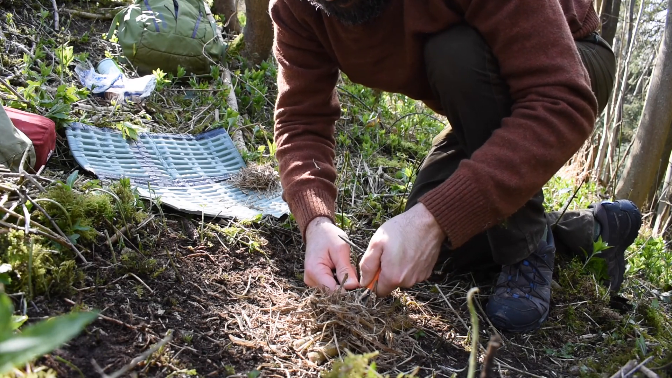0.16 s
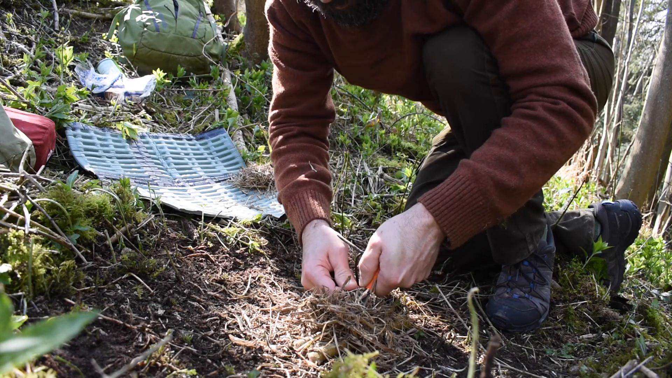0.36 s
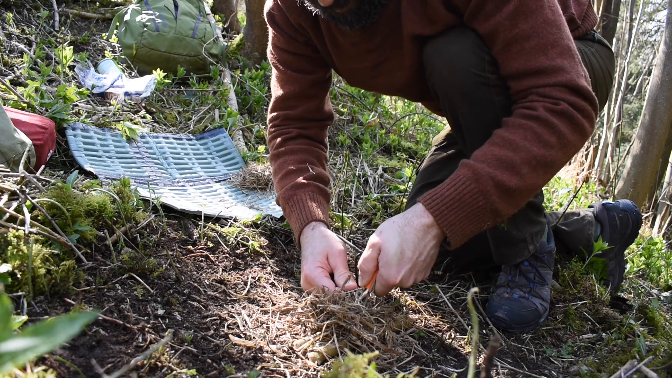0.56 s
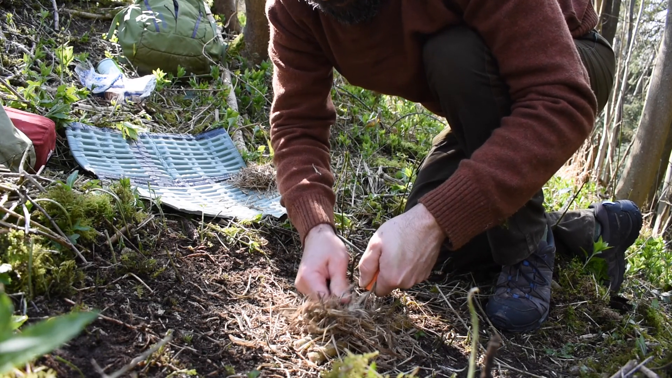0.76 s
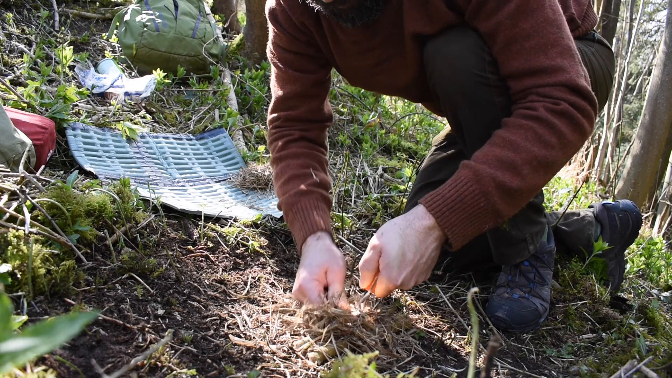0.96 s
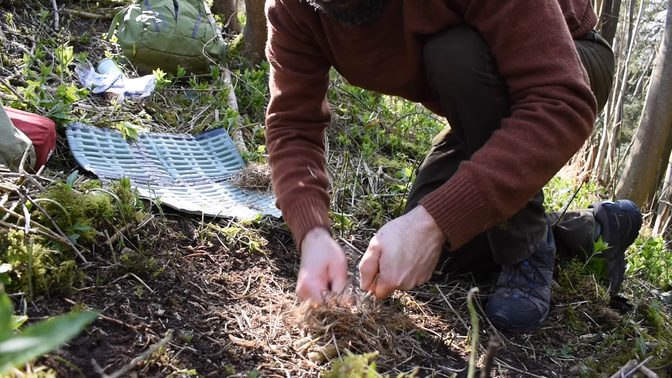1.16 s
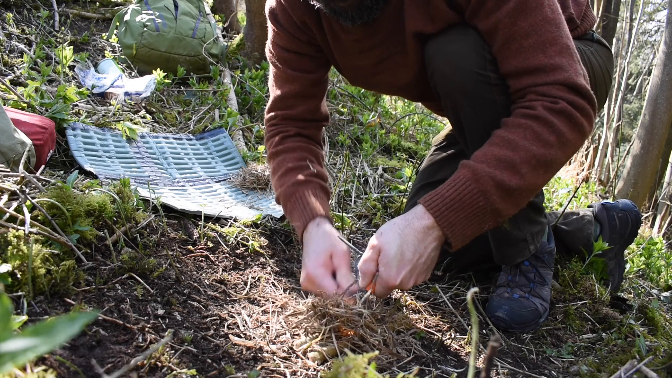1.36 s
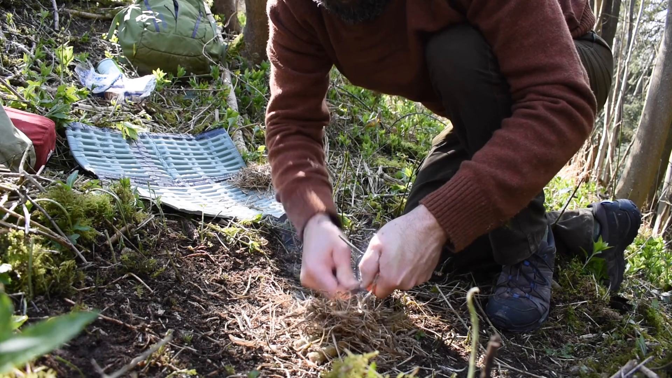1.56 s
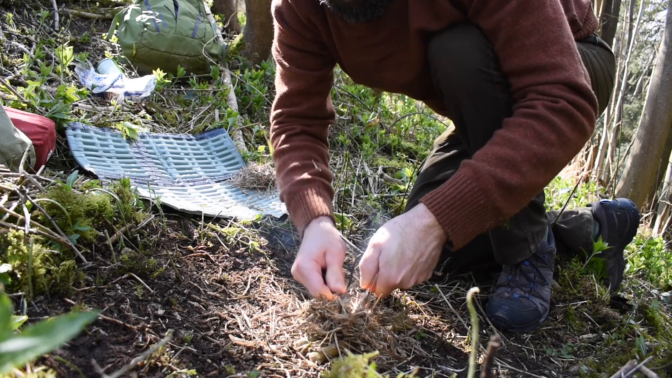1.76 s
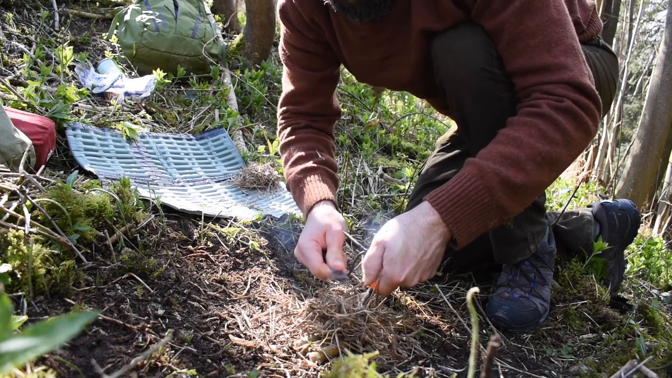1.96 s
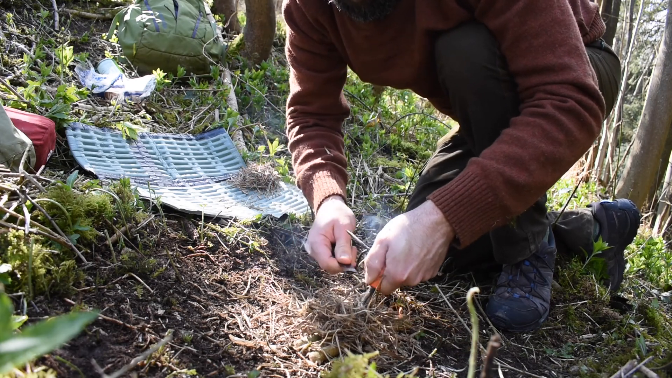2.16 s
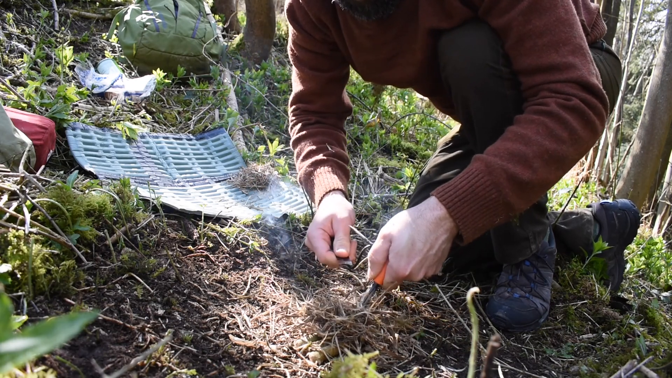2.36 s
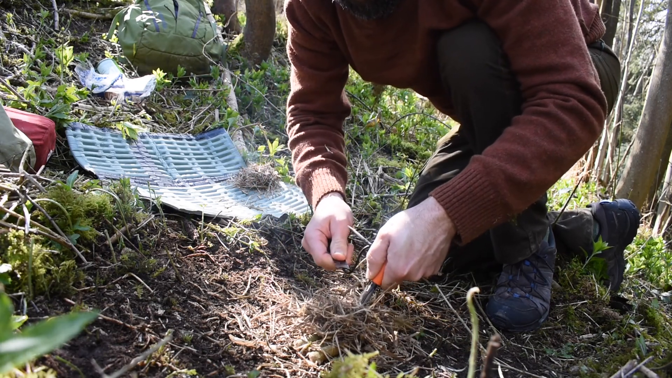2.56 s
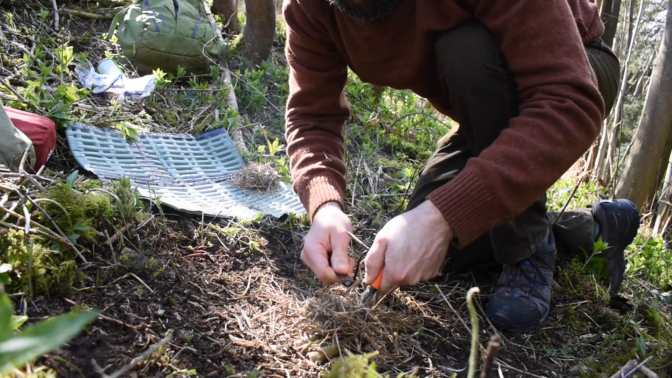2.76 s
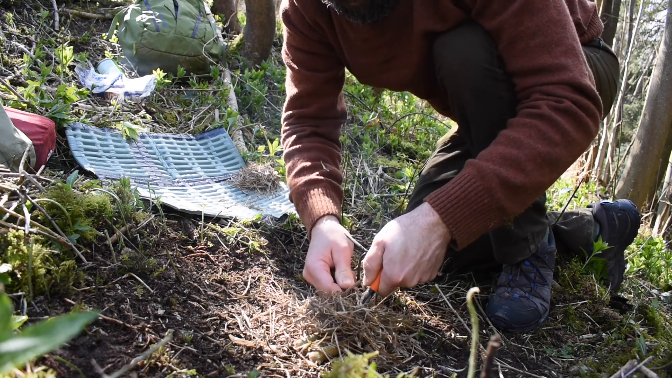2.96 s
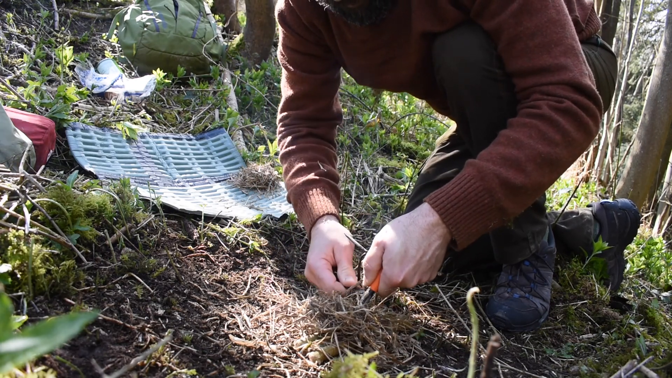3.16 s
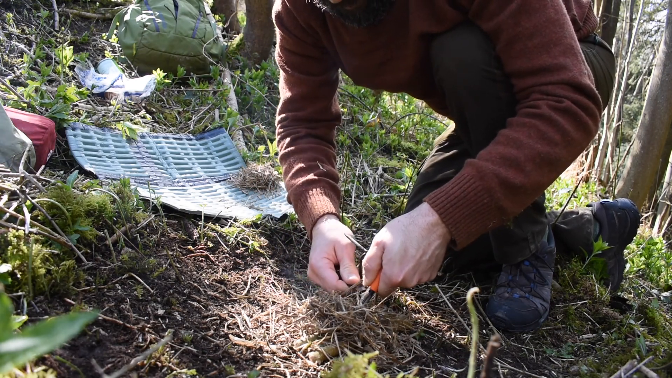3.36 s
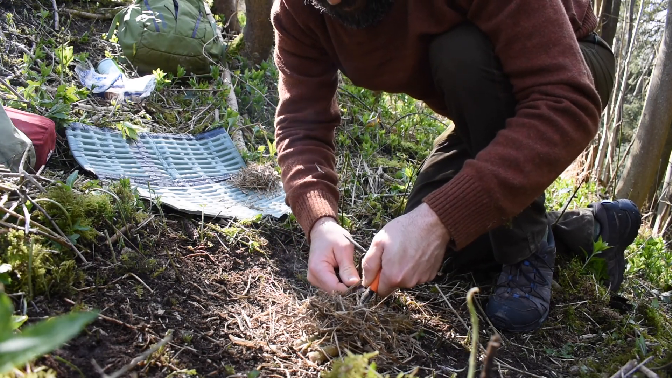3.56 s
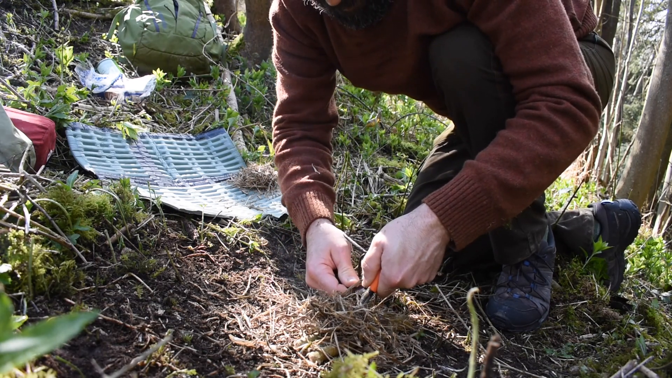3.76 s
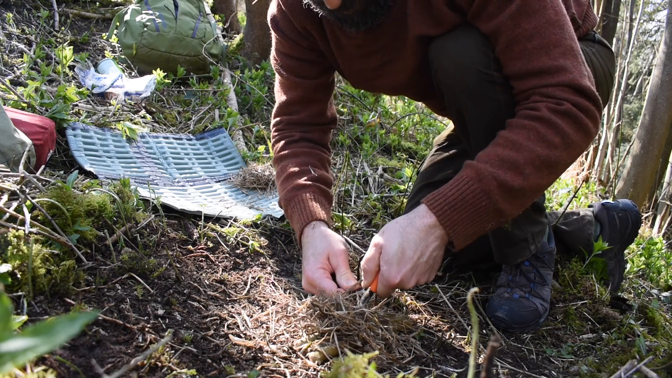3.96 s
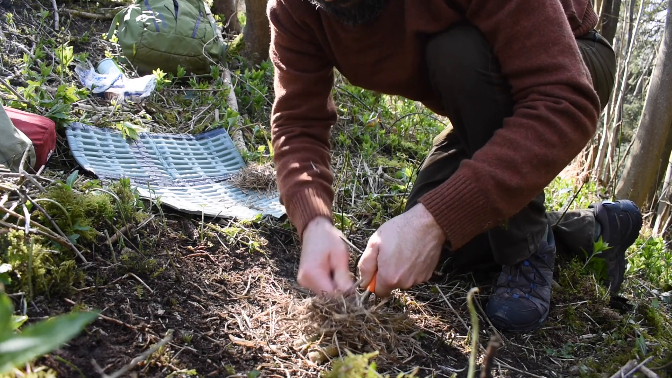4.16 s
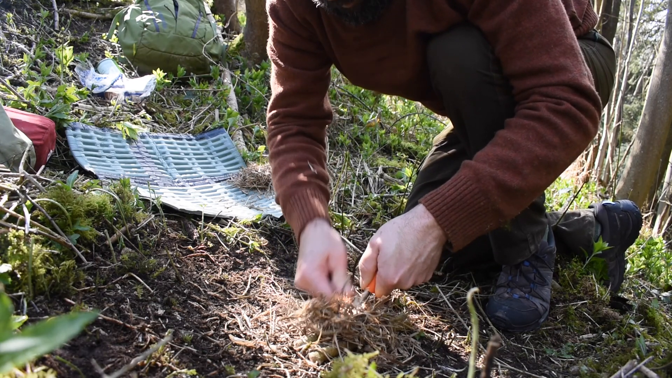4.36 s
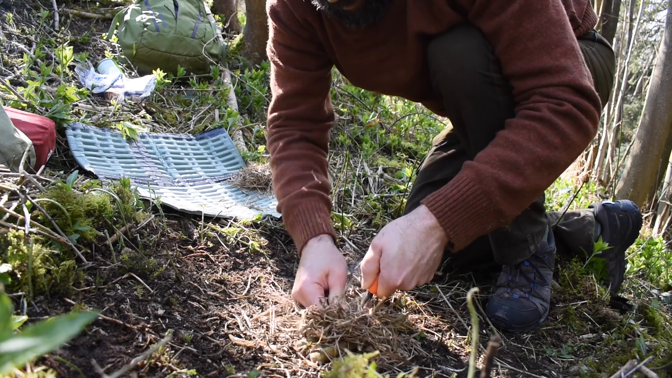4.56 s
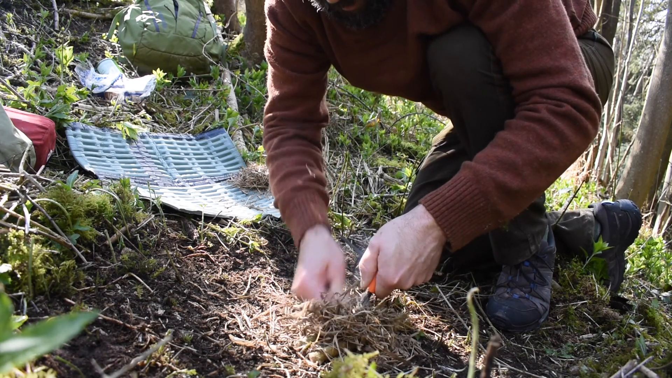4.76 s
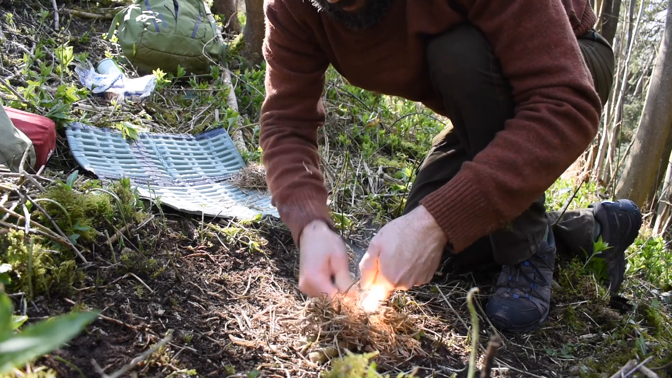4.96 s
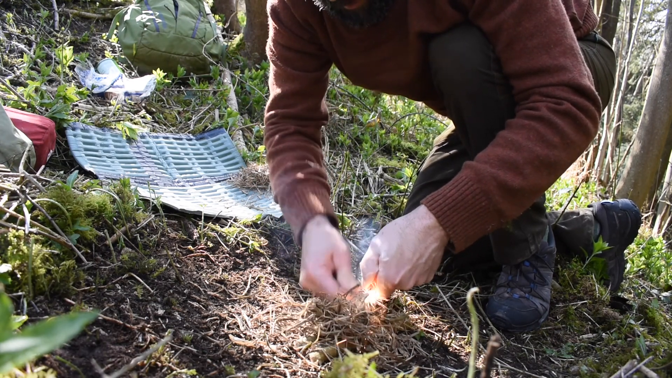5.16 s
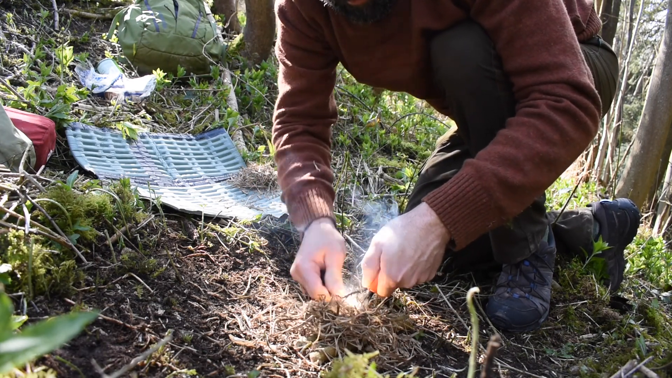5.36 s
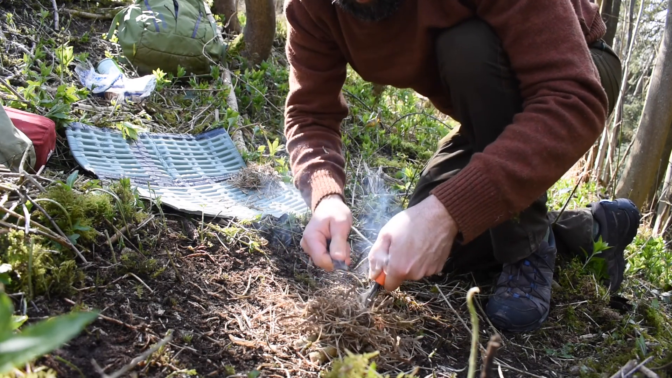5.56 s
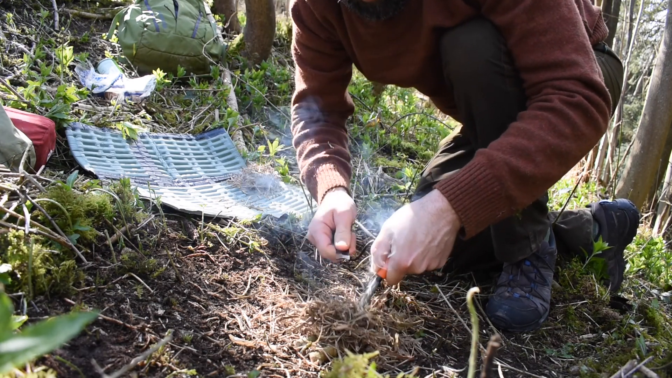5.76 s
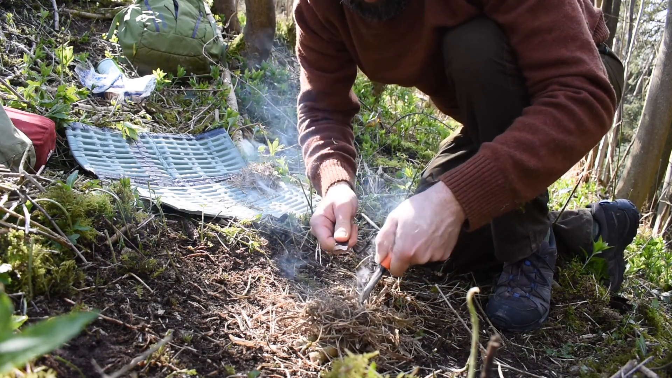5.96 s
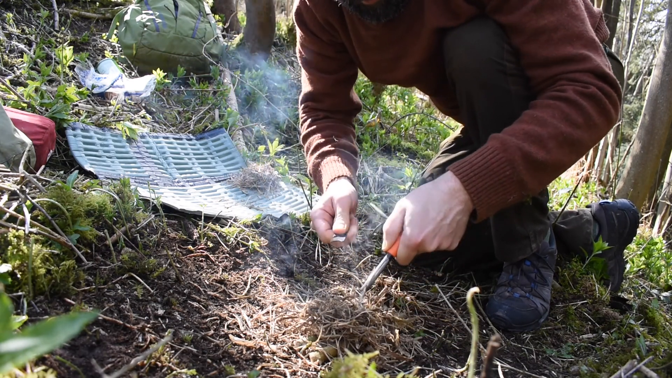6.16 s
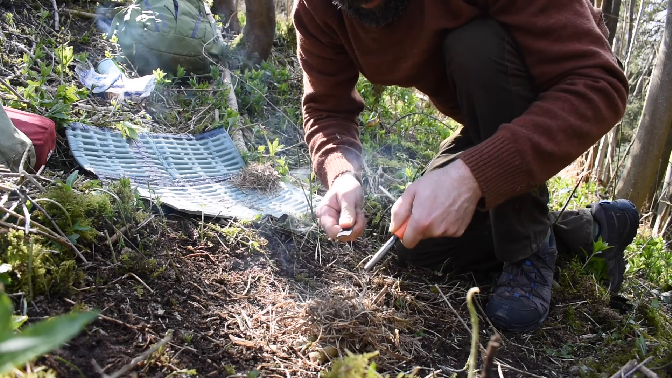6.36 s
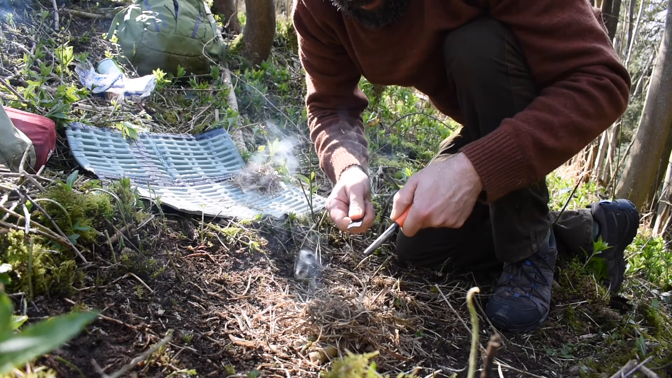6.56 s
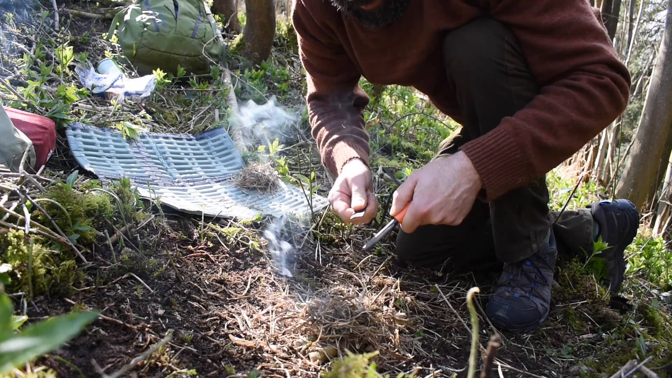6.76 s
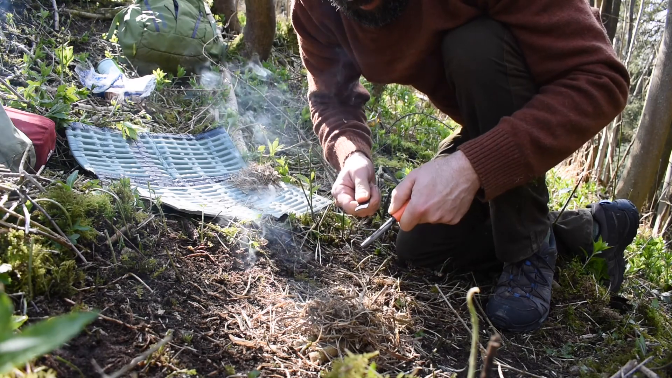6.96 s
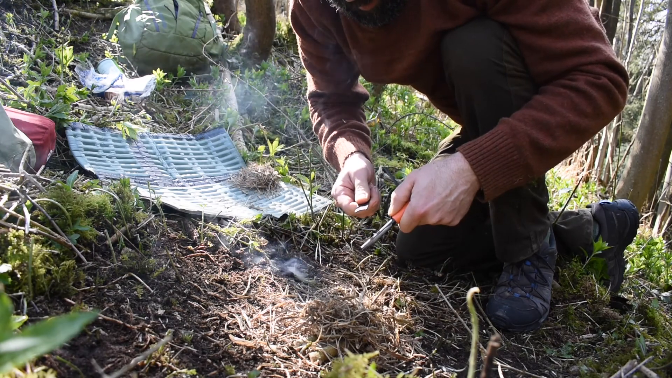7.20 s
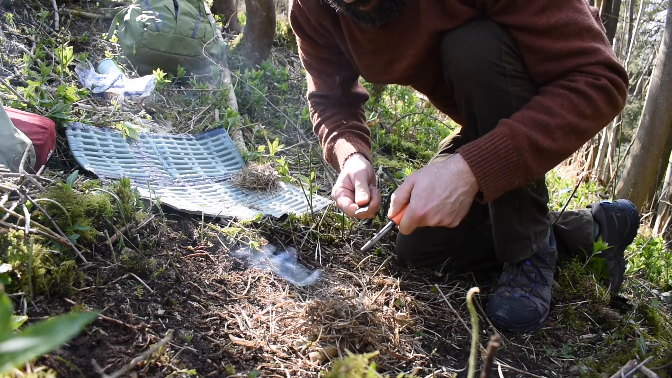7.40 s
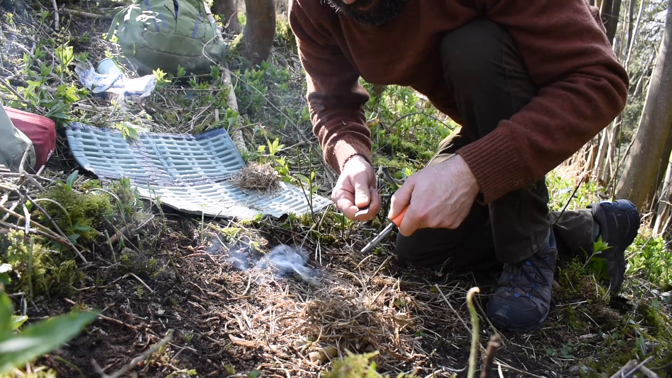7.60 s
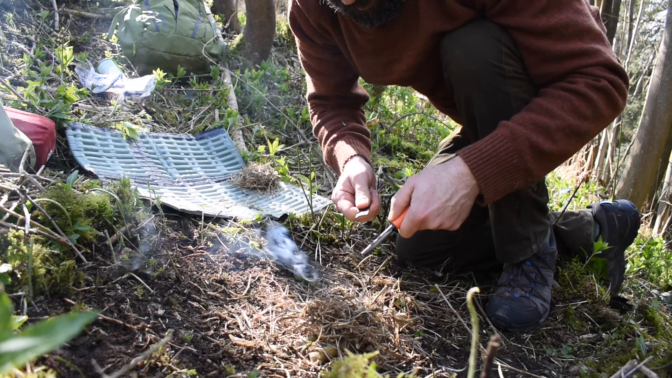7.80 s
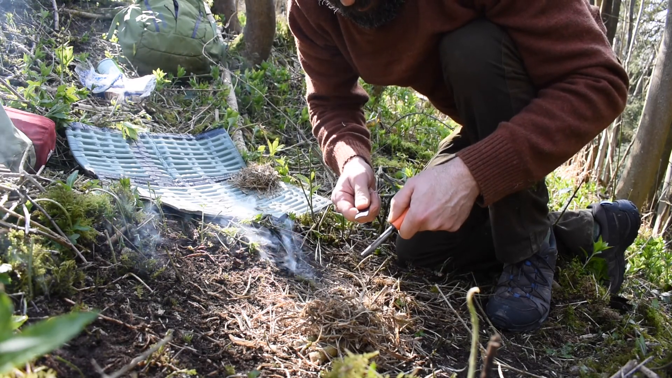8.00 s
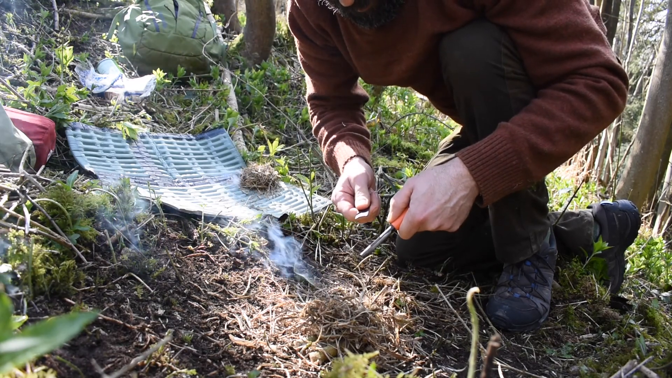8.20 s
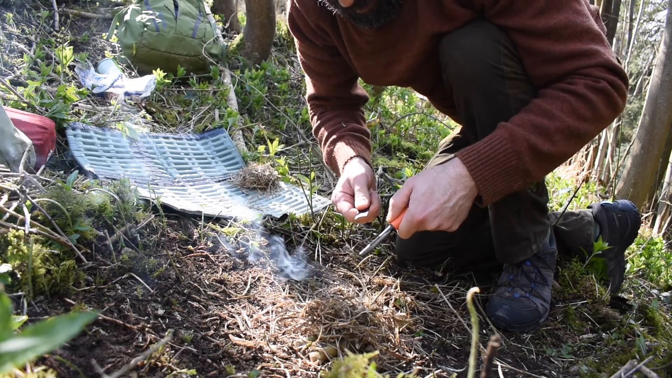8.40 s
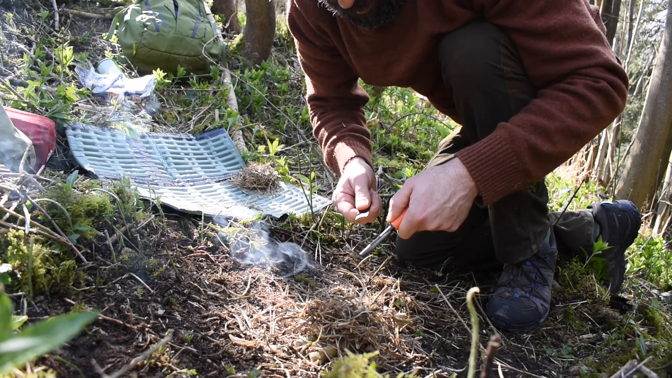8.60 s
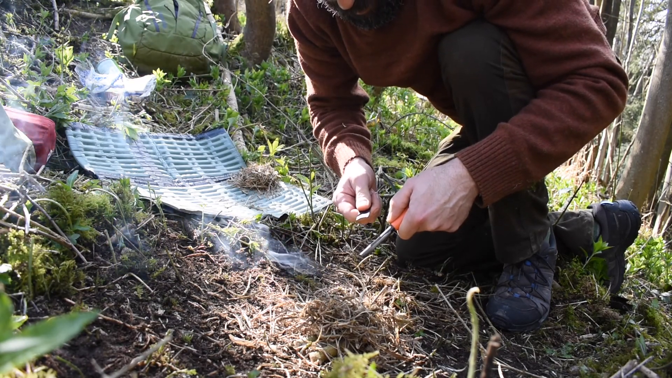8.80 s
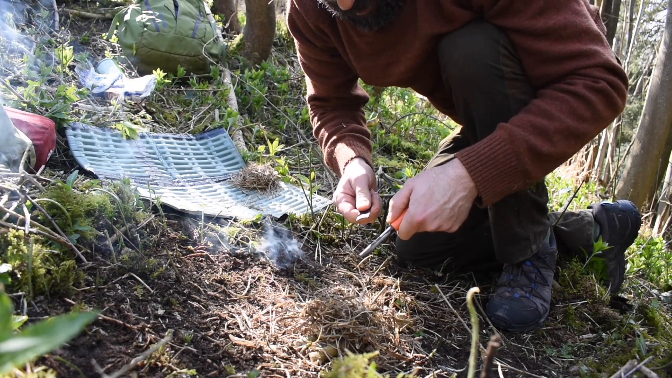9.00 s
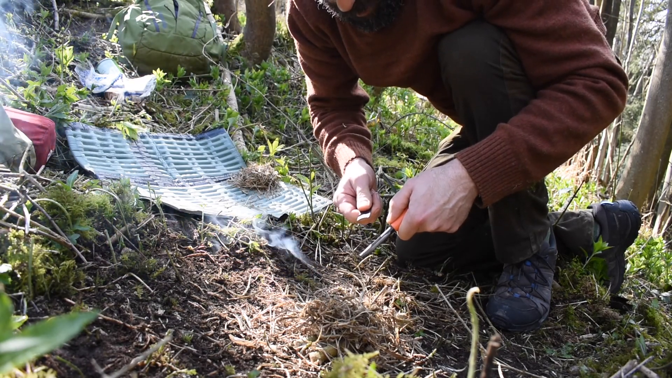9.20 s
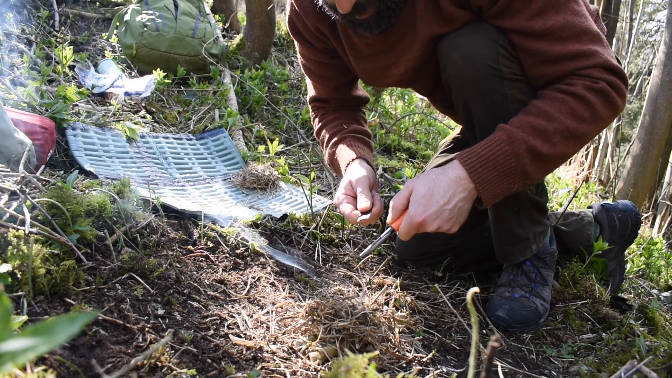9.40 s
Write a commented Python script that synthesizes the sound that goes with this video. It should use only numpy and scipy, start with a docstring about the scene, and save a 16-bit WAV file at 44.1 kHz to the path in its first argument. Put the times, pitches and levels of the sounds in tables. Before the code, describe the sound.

Steel striker rasps down a spark rod in two quick bouts of bright ringing scrapes and crackling sparks, then small clicks and birdsong in quiet woods.

```python
"""On a woodland floor, a steel striker is scraped down a ferro rod in two bouts, over dry tinder.
Grainy friction drives resonances, so the edge bites with a rough, rising ring; shavings flare and crackle
as bursts of filtered grains. Short pulses make the tools click, and the tinder rustles and smoulders in grains.
A small bird repeats a three-note song and another whistles and warbles, all from gliding sines.
Something drones far away on a wavering low tone, under steady air made of filtered noise."""
import sys
import numpy as np
from scipy import signal
from scipy.fft import rfft, irfft
from scipy.io import wavfile

SR = 44100
rng = np.random.default_rng(int(sys.argv[2]) if len(sys.argv) > 2 else 0)


def transcribe(signal):
    """Save signal, clipped to [-1, 1], as a 16-bit WAV file at the path in sys.argv[1]."""
    frames = np.atleast_2d(signal).T
    limited = np.clip(frames, -1, 1)
    pcm = np.round(limited * 32767).astype(np.int16)
    wavfile.write(sys.argv[1], SR, pcm)


N = 416304
TIME = np.arange(N) / SR
WOODS_T60_S = 0.419  # time for the echoes among the trees to fall by 60 dB

# resonances of the striker's edge: (multiple of the ring pitch, width/Hz, relative level/dB)
EDGE_MODES = [(.35, 700, -25.5), (.68, 497, -13.5), (.91, 330, 0), (1.02, 330, 1.5), (1.1, 400, -3),
              (1.29, 698, -12.5), (1.57, 1010, -19.5), (2.15, 1810, -32.5)]
# colour of the flare, also of the rasp under a cut: (f/Hz, relative level/dB)
FLARE_COLOUR = [(40, -43), (110, -28.5), (170, -18), (330, -11.5), (560, -8), (760, 2.5), (1020, -0.5),
                (1200, -11.5), (1430, 3.5), (1800, -0.5), (2400, 4.5), (3300, 2.5), (4400, -3.5),
                (11000, -40)]
# the bright, the middle and the dull part of a tick or a snapping stalk: (f/Hz, relative level/dB)
TICK_TOP = [(2000, -40.5), (4000, -15), (5000, -4), (6000, -3), (7000, 2), (8000, -2), (9000, -6.5),
            (10000, -15.5), (11000, -21.5), (14000, -24.5), (16000, -35)]
TICK_CRACK = [(600, -31.5), (1200, -8.5), (1600, -2), (2400, 0.5), (3300, -2), (4200, -5), (5500, -16.5),
              (11000, -52.5)]
TICK_KNOCK = [(60, -33.5), (250, -9.5), (500, -6), (760, 1.5), (1000, -1), (1250, -8), (3000, -37.5)]


def from_db(db):
    """Turn decibels into a plain gain."""
    return 10 ** (np.asarray(db) / 20)


def rms_one(x):
    """Scale a sound to an rms (average strength) of 1."""
    return x / np.sqrt(np.mean(x ** 2) + 1e-20)


def in_time(points):
    """Join rows of (t/s, value) by straight lines."""
    return np.interp(TIME, *np.transpose(points))


def envelope(events, attack_s, swell_db, fade_db_per_s, column=2):
    """Gain of events (start/s, length/s, .. level/dB ..): each rises, swells or sags, then fades."""
    power = np.zeros(N)
    for row in events:
        start, length = row[0], max(row[1], .005)
        span = slice(int(start * SR), int((start + length + .5) * SR))
        t = TIME[span] - start
        swell = swell_db * (np.minimum(t / length, 1) - .5)
        fade = fade_db_per_s * np.maximum(t - length, 0)
        rise = np.clip(t / attack_s, 0, 1)
        power[span] += (rise * from_db(row[column] + swell - fade)) ** 2
    return np.sqrt(power)


def drift(rate):
    """Slow random wandering with a spread of 1; a higher rate (Hz) wanders faster."""
    # smooth noise at a twentieth of the sample rate, then join the points
    r = np.exp(-40 * np.pi * rate / SR)
    noise = rng.standard_normal(N // 20 + 4002)
    slow = signal.lfilter([1], [1, -2 * r, r * r], noise)[4000:]
    return np.interp(np.arange(N) / 20, np.arange(len(slow)), rms_one(slow))


def chatter(rate, depth_db):
    """A randomly wavering gain of rms 1, such as uneven stick and slip."""
    return rms_one(from_db(depth_db * np.tanh(drift(rate) / 2) * 2))


def grains(per_s, spread_db, hiss):
    """Random tiny fractures of uneven size over a smooth hiss; rms 1."""
    sizes = from_db(spread_db * np.minimum(rng.exponential(1, N), 4))
    signed = sizes * rng.choice([-1, 1], N)
    fractures = rms_one(signed * (rng.random(N) < per_s / SR))
    return rms_one(fractures + hiss * rng.standard_normal(N))


def response(spectrum, size=4096):
    """Short filter of unit energy with the given colour, falling away below its first point."""
    hz, db = np.transpose(spectrum)
    grid = np.maximum(np.fft.rfftfreq(size, 1 / SR), 10)
    gain = from_db(np.interp(np.log(grid), np.log(hz), db)) * np.minimum(grid / hz[0], 1)
    # fold the cepstrum so that the filter's energy comes as early as possible
    cepstrum = irfft(np.log(gain))
    cepstrum[1:size // 2] *= 2
    cepstrum[size // 2 + 1:] = 0
    h = irfft(np.exp(rfft(cepstrum)))
    return h / np.linalg.norm(h)


def through(x, h):
    """Pass a sound through a filter or a cloud of echoes."""
    return signal.oaconvolve(x, h)[:N]


def dying_noise(t60):
    """A cloud of echoes of unit energy that falls by 60 dB in t60 seconds."""
    t = np.arange(int(t60 * SR) + 2) / SR
    cloud = rng.standard_normal(len(t)) * from_db(-60 * t / t60)
    return cloud / np.linalg.norm(cloud)


def resonate(x, hz, width_hz):
    """A resonance with gain 1 on top."""
    r = np.exp(-np.pi * width_hz / SR)
    feed = np.array([1, 0, -1]) * (1 - r * r) / 2
    return signal.lfilter(feed, [1, -2 * r * np.cos(2 * np.pi * hz / SR), r * r], x)


def ring(friction, modes, pitch, count):
    """Resonances driven by friction, following a moving pitch by cross-fades between fixed ones."""
    centres, step = np.linspace(pitch.min(), pitch.max() + 1, count, retstep=True)
    out = 0
    for hz in centres:
        body = 0
        for k, (ratio, width, db) in enumerate(modes):
            body = body + (-1) ** k * from_db(db) * resonate(friction, ratio * hz, width)
        nearness = np.maximum(1 - abs(pitch - hz) / step, 0)
        out = out + nearness * rms_one(body)
    return out


def glide(strokes, start_hz, end_hz):
    """A pitch that runs from start to end during every stroke, and stays there until the next."""
    pitch = np.full(N, np.mean(start_hz))
    each = np.ones(len(strokes))
    for row, first, last in zip(strokes, start_hz * each, end_hz * each):
        at = int(row[0] * SR)
        pitch[at:] = np.interp(TIME[at:], [row[0], row[0] + row[1]], [first, last])
    return pitch


def shimmer(x, rate, depth_db):
    """Bands of a sound from low to high swell and dip on their own, so its colour keeps shifting."""
    # edges between the bands: (f/Hz)
    band_edges = (600, 1200, 2000, 3000)
    out = 0
    for hz in band_edges:
        low = signal.sosfiltfilt(signal.butter(2, hz, fs=SR, output="sos"), x)
        out, x = out + low * chatter(rate, depth_db), x - low
    return out + x * chatter(rate, depth_db)


def cuts(level_db=-0.5, rasp_db=-19.0, glide_share=0.05):
    """The ring glides up as the contact point travels along the rod; a plain rasp lies under it."""
    # the edge cutting down the rod: (start/s, length/s, level before level_db/dB, mid-stroke ring pitch f/Hz)
    cut_strokes = [(0.646, 0.021, -44, 6000), (0.681, 0.056, -37.0, 6120), (0.924, 0.061, -37, 6000.0),
                   (1.167, 0.03, -35.5, 5690), (1.396, 0.048, -37, 6060), (1.611, 0.0472, -37.0, 5900),
                   (4.001, 0.065, -39.5, 6170), (4.29, 0.056, -40, 5630), (4.531, 0.036, -34.5, 5920),
                   (4.751, 0.0428, -36.0, 6134), (4.979, 0.0446, -34.0, 6460)]
    friction = grains(per_s=9000, spread_db=2.5, hiss=.6) * chatter(rate=130, depth_db=2.0)
    hz = np.array(cut_strokes)[:, -1]
    pitch = glide(cut_strokes, hz * (1 - glide_share), hz * (1 + glide_share))
    edge = ring(friction, EDGE_MODES, pitch, count=14)
    rasp = from_db(rasp_db) * through(friction, response(FLARE_COLOUR))
    # the sound swells as the pressure builds
    pressure = envelope(cut_strokes, attack_s=0.01, swell_db=2.0, fade_db_per_s=764)
    return from_db(level_db) * pressure * (edge + rasp)


def returns():
    """Sliding back with little pressure, rod and edge both ring and sink in pitch."""
    # the striker sliding lightly back up: (start/s, length/s, rod ring level/dB, edge ring level/dB)
    slides = [(.064, 0.032, -73.5, -67.5), (.137, 0.0219, -67, -64.5), (.806, 0.068, -48.5, -46),
              (1.061, 0.045, -54, -41), (4.164, 0.0535, -49.5, -45), (4.428, 0.045, -52.5, -44.5)]
    # resonances of the hand-held rod: (multiple of its pitch, width/Hz, relative level/dB)
    rod_modes = [(.38, 300, -16.5), (1, 320, 4.5), (1.24, 370.4, -1.5), (1.85, 600, -3.5)]
    # pitch of the rod and of the edge during a slide: (start f/Hz, end f/Hz)
    rod_glide = (2200, 1780)
    edge_glide = (6900, 6200)
    friction = grains(per_s=2500, spread_db=5.5, hiss=0.45) * chatter(rate=110, depth_db=4.5)
    rod = ring(friction, rod_modes, glide(slides, *rod_glide), count=6)
    edge = ring(friction, EDGE_MODES, glide(slides, *edge_glide), count=6)
    shape = dict(attack_s=0.0081, swell_db=9, fade_db_per_s=1501)
    return envelope(slides, **shape, column=2) * rod + envelope(slides, **shape, column=3) * edge


def showers(sizzle_db=0.45, snap_db=-7.5, knock_db=-14.0):
    """Shavings tear off and burst: a crackling flare, a bright sizzle, stray snaps and dull knocks."""
    # showers of burning shavings: (start/s, length/s, flare level/dB, sizzle level before sizzle_db/dB)
    spark_showers = [(0.952, 0.0416, -47, -40), (0.986, 0.07, -46.0, -45.5), (1.073, 0.057, -45.0, -45),
                     (1.165, 0.072, -45.5, -41.5), (1.251, 0.09, -43.5, -45), (1.349, 0.034, -58, -54.5),
                     (1.427, 0.054, -42.5, -43.5), (1.501, 0.07, -44, -43), (1.639, 0.057, -44.0, -42.5),
                     (1.731, 0.14, -48, -47.0), (4.304, 0.035, -52, -39), (4.324, 0.0325, -39, -44.5),
                     (4.37, 0.015, -51, -48.5), (4.42, 0.058, -46.5, -45.0), (4.554, 0.048, -40.0, -40.0),
                     (4.625, 0.094, -49.5, -46.5), (4.776, 0.0537, -43.5, -42.5),
                     (4.839, 0.11, -45.5, -42.5), (4.993, 0.0862, -42.5, -41.5),
                     (5.115, 0.0257, -42.5, -38.5), (5.182, 0.046, -47.5, -37.5),
                     (5.224, 0.0662, -41.5, -38.5), (5.286, 0.021, -48.5, -52.0),
                     (5.35, 0.0795, -49.5, -47.5), (5.487, 0.0497, -59.5, -61)]
    # colour of the sizzle: (f/Hz, relative level/dB)
    sizzle_colour = [(1500, -27.5), (3500, -9), (4700, -2), (6000, -0.5), (7000, 2), (8200, 0), (9000, -7),
                     (10000, -11), (11000, -19), (14000, -24), (16000, -37)]
    # colour of the knocks in the tinder: (f/Hz, relative level/dB)
    tinder_colour = [(80, -20.5), (180, -7), (350, 0.5), (650, 3), (1000, -5), (2500, -31.5)]
    bursts = grains(per_s=1100, spread_db=3.5, hiss=0.52)
    fine = grains(per_s=3500, spread_db=4.5, hiss=0.73)
    flare = through(bursts * chatter(rate=77, depth_db=1.5), response(FLARE_COLOUR))
    flare = shimmer(flare, rate=50, depth_db=2.5)
    sizzle = rms_one(fine + 0.62 * bursts) * chatter(rate=170, depth_db=2.7)
    sizzle = from_db(sizzle_db) * through(sizzle, response(sizzle_colour))
    snap_sound = response(TICK_TOP) + response(TICK_CRACK)
    snaps = rms_one(through(grains(per_s=45, spread_db=2.0, hiss=0), snap_sound))
    knocks = through(grains(per_s=160, spread_db=1.5, hiss=0), response(tinder_colour))
    body = flare + from_db(snap_db) * snaps + from_db(knock_db) * knocks
    # a shower sags as it burns out
    shape = dict(attack_s=0.014, swell_db=-2.5, fade_db_per_s=360)
    return envelope(spark_showers, **shape, column=2) * body + envelope(spark_showers, **shape, column=3) * sizzle


def ticks(scatter=0.83, scatter_t60=0.017):
    """Each tick is a sharp pulse with brief scatter from hands and ground; bright ones knock less."""
    # steel ticking on the rod and stalks snapping: (t/s, level before the part levels/dB, brightness/dB)
    tick_list = [(0.8735, -36.5, 0), (1, -38, 1.0), (1.1039, -34, 5.5), (1.115, -53, 3), (1.1234, -35.0, 3),
                 (1.136, -38.0, -2.0), (1.165, -40, -1), (1.4426, -39.5, 6.5), (1.504, -44, -2.0),
                 (1.5423, -40.5, 3.5), (1.5867, -39, -2.5), (1.6633, -38.5, 4.5), (1.7519, -41.5, -5),
                 (1.883, -39.5, 1), (1.9502, -50.5, 2.0), (2.121, -43.0, -1.5), (2.1248, -45.5, -6.0),
                 (2.131, -48, -3), (2.1392, -50, -3.5), (2.2113, -45.5, -1), (2.2579, -54, -4),
                 (2.8295, -46.0, 3.5), (2.887, -47.0, 2), (3.1373, -54, 3.5), (3.322, -60, -0.0),
                 (4.2246, -45.5, -2.5), (4.445, -38.5, 2.5), (4.4527, -37.5, -3), (4.6494, -42.5, -4.0),
                 (4.866, -46, 7.0), (4.8825, -43, 2), (5.0673, -38, -3), (5.0762, -41.5, -6.0),
                 (5.1247, -40, -6), (5.149, -32.5, 3.5), (5.1816, -35.5, -9), (5.1951, -37, 1),
                 (5.3643, -48.0, 0), (5.4759, -48, 3.5), (5.532, -47.5, -3.5), (5.6524, -42.5, 0),
                 (5.6824, -44.5, 1.0), (5.6899, -32, -1), (5.727, -51, 1.5), (5.9235, -45.5, -2),
                 (5.9302, -35.0, 2.5), (6.1397, -50.5, 4), (6.1483, -46, -5), (6.173, -37, 1),
                 (6.178, -37, 2.5), (6.3902, -51, 0.0), (6.461, -49, 1), (6.5705, -46.0, -0.5),
                 (6.7098, -50, 4), (6.85, -47.5, 0.5), (7.8867, -34.0, -5.0), (7.895, -47, 6),
                 (7.9061, -34.5, 1.5), (7.9273, -43.0, -0.5), (7.9939, -52.5, -3.5), (8.4865, -57.5, 3.0),
                 (9.033, -39.0, 2.5), (9.0657, -41, 2), (9.0803, -41.0, 3.0), (9.0999, -44.0, 3.5)]
    # colour, level/dB, and how strongly the part follows the brightness
    parts = [(TICK_KNOCK, -12.5, -0.88), (TICK_CRACK, -4.5, -0.23), (TICK_TOP, 0.0, 1.0)]
    out = 0
    for spectrum, part_db, tilt in parts:
        pulses = np.zeros(2 * N)
        for s, db, bright_db in tick_list:
            pulse = scatter * dying_noise(scatter_t60)
            pulse[0] = 1
            at = int(s * SR)
            gain = from_db(db + part_db + tilt * bright_db)
            pulses[at:at + len(pulse)] += gain * pulse / np.linalg.norm(pulse)
        out = out + through(pulses[:N], response(spectrum))
    return out * np.sqrt(.005 * SR)  # levels count as an average over 5 ms


def rustles(level_db=7.5, crack_db=-2.5, knock_db=-7.0):
    """Dry stalks crackle against each other."""
    # dry tinder stirred by the hands: (start/s, length/s, level before level_db/dB)
    stirs = [(.34, .17, -85.5), (.765, 0.064, -69.5), (1.9, 0.11, -72), (2.115, .045, -73),
             (2.205, 0.0925, -77.5), (2.83, .22, -79.5), (3.14, 0.028, -78), (3.314, 0.018, -85),
             (4.09, 0.11, -73), (5.56, 0.081, -75.5), (5.655, 0.0327, -65), (5.735, 0.16, -80),
             (5.92, 0.023, -71), (6.128, 0.046, -74), (6.38, 0.0857, -65.5), (6.704, 0.014, -70.5),
             (6.818, 0.032, -65), (7.885, 0.055, -74.5), (9.057, 0.062, -62), (9.115, 0.18, -77)]
    crackle = grains(per_s=1500, spread_db=3.5, hiss=0.59) * chatter(rate=75, depth_db=5.5)
    stalk = response(TICK_TOP) + from_db(crack_db) * response(TICK_CRACK)
    stalk = stalk + from_db(knock_db) * response(TICK_KNOCK)
    stirring = envelope(stirs, attack_s=0.0025, swell_db=-4.5, fade_db_per_s=280)
    return from_db(level_db) * stirring * through(crackle, stalk)


def thuds(level_db=-3.5, t60=0.13):
    """Soft ground answers with a short dull rumble."""
    # the hand landing on the ground at the end of a stroke: (t/s, peak level before level_db/dB)
    landings = [(1.0, -67), (1.21, -70), (1.46, -68), (1.675, -56.5), (4.339, -68), (4.58, -64),
                (4.799, -60.5), (5.03, -56.5), (5.255, -64)]
    # colour of the ground: (f/Hz, relative level/dB)
    ground_colour = [(30, -22), (55, -2.5), (90, -10), (160, 5), (260, -11), (500, -31)]
    blows = np.zeros(N)
    for s, db in landings:
        thud = signal.fftconvolve(dying_noise(t60), response(ground_colour))
        at = int(s * SR)
        blows[at:at + len(thud)] += from_db(db + level_db) * thud / abs(thud).max()
    return blows


def smoulder():
    """Hot tinder gives a faint, grainy hiss."""
    # the tinder smouldering late in the second bout and after it: (t/s, level/dB)
    smoulder_level = [(5.3, -68.5), (5.55, -66.5), (5.9, -77), (6.2, -81), (6.5, -70.5), (7.15, -79),
                      (7.5, -84)]
    # colour of its hiss: (f/Hz, relative level/dB)
    hiss_colour = [(70, -16), (170, 3), (300, 3), (600, 3), (1000, 2.5), (1300, 10), (1700, -1), (4000, -5),
                   (8000, -38), (14000, -42)]
    alight = (TIME > smoulder_level[0][0]) & (TIME < smoulder_level[-1][0])
    hiss = through(grains(per_s=3700, spread_db=1.0, hiss=0.63), response(hiss_colour))
    return alight * from_db(in_time(smoulder_level)) * hiss


def note(rows, warble_hz=70):
    """One bird note: a sine with a quick warble, on rows of (t/s, f/Hz, level/dB, warble depth/Hz)."""
    s, hz, db, depth = np.transpose(rows)
    span = (TIME >= s[0]) & (TIME <= s[-1])
    t, out = TIME[span], np.zeros(N)
    # the small random steps keep the warble uneven
    warble = np.sin(2 * np.pi * warble_hz * t + np.cumsum(rng.normal(0, 0.044, len(t))))
    pitch = np.interp(t, s, hz) + np.interp(t, s, depth) * warble
    tone = np.sin(2 * np.pi * np.cumsum(pitch) / SR)
    level = np.sqrt(2) * from_db(np.interp(t, s, db))
    out[span] = level * tone * signal.windows.tukey(len(t), .1)
    return out


def swell_note(s, length, hz, fall_hz, db):
    """A bird note that rises quickly in level, then fades while its pitch sags."""
    return note([(s, hz + fall_hz, db - 5, 35),
                 (s + .2 * length, hz + fall_hz / 2, db + 2, 35),
                 (s + length, hz - fall_hz / 2, db - 3, 35)])


def song(note_s=0.169, near_t60=0.36):
    """A low note, a faint chirp stepping down to a high note, then a middle note, mostly by way of the trees."""
    # the small bird's phrases: (start/s, pitch around which the high note falls f/Hz, level before mixing/dB)
    phrases = [(5.55, 5150, -70.5), (6.06, 5190, -67), (6.59, 4950, -69), (7.11, 5120, -66.5),
               (7.654, 4980, -68), (8.18, 5150, -69.5), (8.69, 4980, -68.5)]
    out = np.zeros(N)
    for low, high_hz, db in phrases:
        high, middle = low + .15, low + .22
        out += swell_note(low, note_s, 3450, fall_hz=30, db=db - 0.5)
        out += swell_note(high, 0.055, 5450, fall_hz=160, db=db - 12.0)  # the chirp
        out += swell_note(high + 0.027, 0.099, high_hz, fall_hz=90, db=db - 2.0)
        out += swell_note(middle, note_s, 4310, fall_hz=40, db=db - 1.0)
    near = through(out, dying_noise(near_t60))
    far = through(out, dying_noise(WOODS_T60_S))
    heard = .3 * out + .55 * near + .8 * far
    return heard * chatter(rate=30, depth_db=2.0)


def whistler(level_db=-1.0, echo_db=-4.5):
    """Falling whistles, strongest at the octave, then a rough warble of several voices."""
    # the second bird's whistles: (start/s, length/s, start pitch f/Hz, level before level_db/dB)
    whistle_list = [(2.787, 0.022, 1275, -61), (9.056, .05, 1372, -53), (9.173, .066, 1400, -55)]
    # warbling voices: (start/s, start pitch f/Hz, steady pitch f/Hz, settling time/s, level before level_db/dB)
    warble_list = [(9.207, 1780, 1336, .11, -63.5), (9.222, 2850, 2620, 0.0153, -64),
                   (9.25, 2130, 2320, 0.0285, -68)]
    voice = np.zeros(N)
    for s, length, hz, db in whistle_list:
        part = np.linspace(0, 1, num=3)
        times = s + length * part
        pitch = hz * (1 - .245 * part)
        level = db - 4 * abs(2 * part - 1)  # softer at both ends
        voice += note(np.c_[times, pitch, level - 8, 0 * part])  # weaker fundamental
        voice += note(np.c_[times, 2 * pitch, level, 0 * part])
    for s, start_hz, steady_hz, settle_s, db in warble_list:
        t = TIME[TIME >= s] - s
        pitch = steady_hz + (start_hz - steady_hz) * np.exp(-t / settle_s)
        level = db + 4 * np.exp(-t / .03)  # each voice starts a little louder
        depth_hz = 150 * np.minimum(t / 0.0707, 1) ** 2  # the warble widens at first
        voice += note(np.c_[s + t, pitch, level, depth_hz])
    voice = from_db(level_db) * voice * chatter(rate=82, depth_db=1.5)
    return voice + from_db(echo_db) * through(voice, dying_noise(WOODS_T60_S))


def far_drone():
    """A low tone far away whose strength and phase waver at random."""
    # loudness of the drone: (t/s, level/dB)
    drone_level = [(0, -85.5), (2.5, -95), (3.3, -95.5), (3.8, -90), (4.7, -88), (5.4, -81), (6.5, -89),
                   (8.6, -87.5), (8.85, -93)]
    # its pitch creeps upward, then barely sinks: (t/s, f/Hz)
    drone_pitch = [(3.8, 86.37), (5.4, 91.18), (8.0, 90.9)]
    phase = 2 * np.pi * np.cumsum(in_time(drone_pitch)) / SR
    drone = rms_one((1 + .6 * drift(9)) * np.cos(phase) + .6 * drift(9) * np.sin(phase))
    return from_db(in_time(drone_level)) * drone


def woodland_air(level_db=-68.5):
    """Steady noise, coloured like open air among trees."""
    # colour of the air: (f/Hz, relative level/dB)
    air_colour = [(20, -23), (45, -20), (70, -14), (120, -7), (180, -3.5), (300, -1), (600, -2), (1300, -3),
                  (2800, -7.5), (5000, -10.5), (8000, -17.5), (11000, -21), (15800, -27)]
    return from_db(level_db) * through(rng.standard_normal(N), response(air_colour))


def scene(ground_db=-10.0, ground_t60=0.039, woods_db=-25.5):
    """The work is close by, with quick echoes off the ground and a faint tail from the trees."""
    work = cuts() + returns() + showers() + rustles() + ticks() + thuds()
    ground = from_db(ground_db) * through(work, dying_noise(ground_t60))
    woods = from_db(woods_db) * through(work, dying_noise(WOODS_T60_S))
    birds = song() + whistler()
    return (work + ground + woods + smoulder() + birds + far_drone() + woodland_air())[None]


def record(dry):
    """Cut the top steeply above 15.9 kHz."""
    steep = signal.ellip(10, .1, 70, 15900, fs=SR, output="sos")
    return signal.sosfilt(steep, dry)


dry = scene()
out = record(dry)
transcribe(out)
```